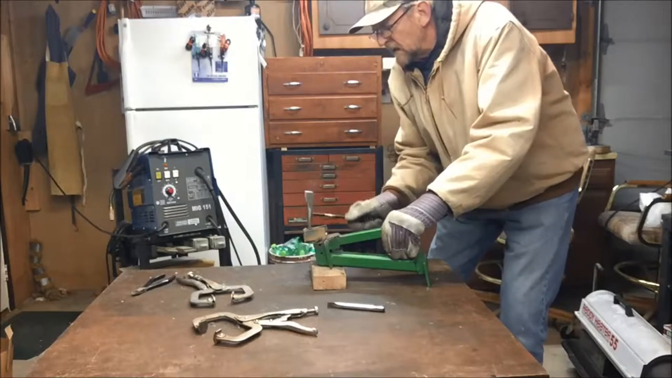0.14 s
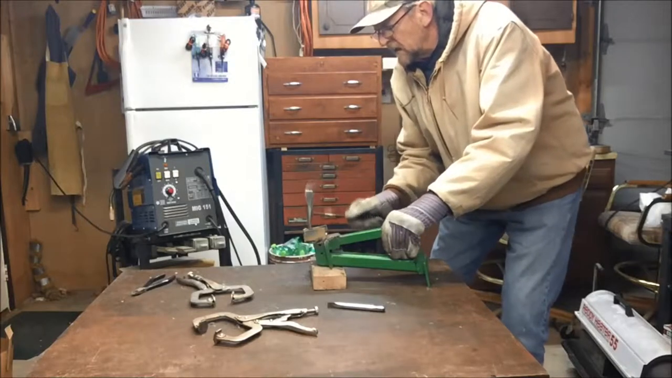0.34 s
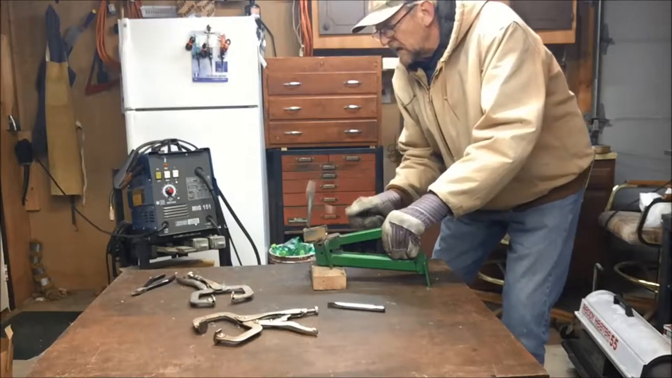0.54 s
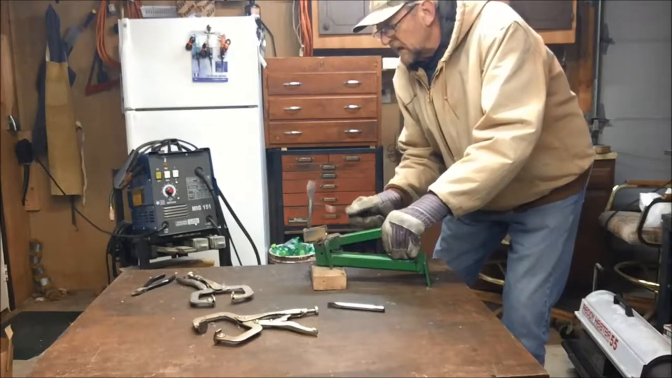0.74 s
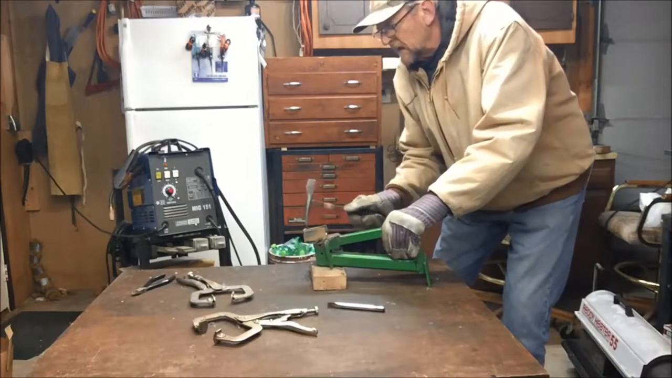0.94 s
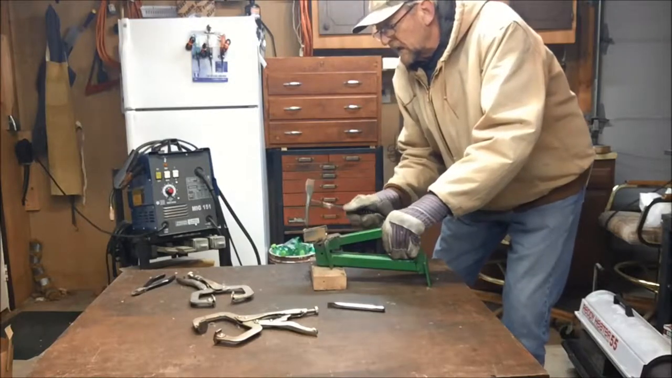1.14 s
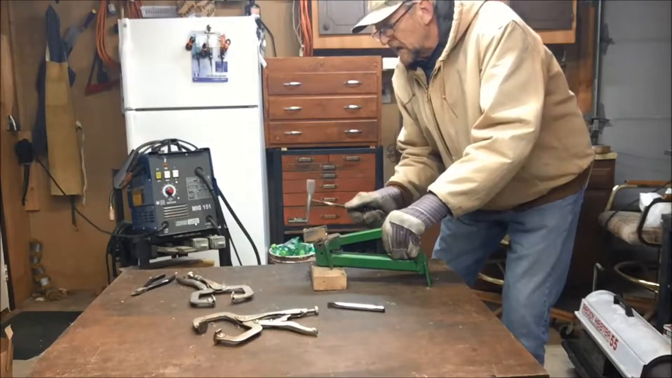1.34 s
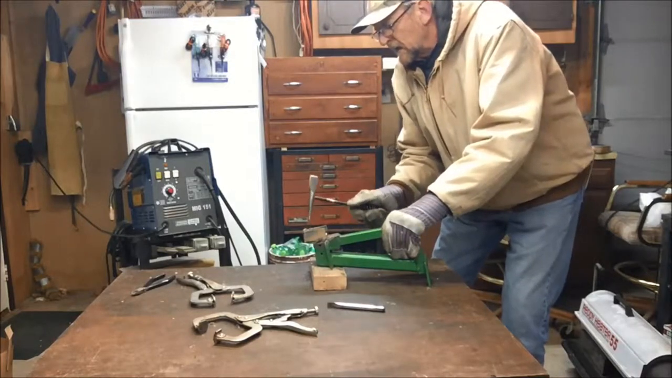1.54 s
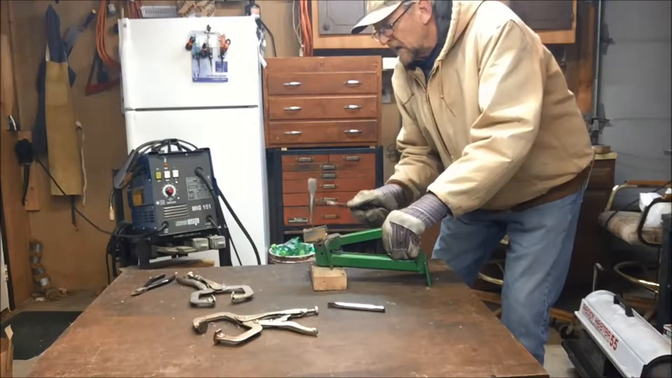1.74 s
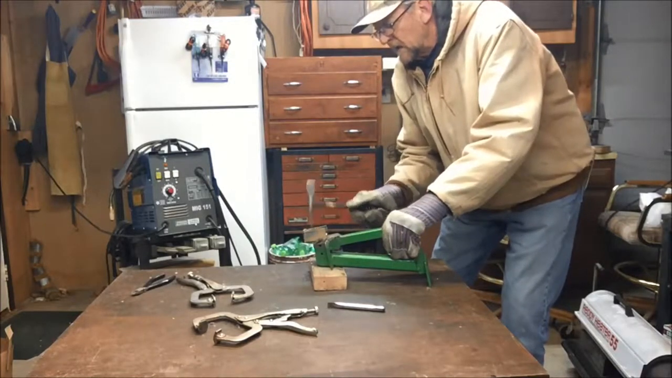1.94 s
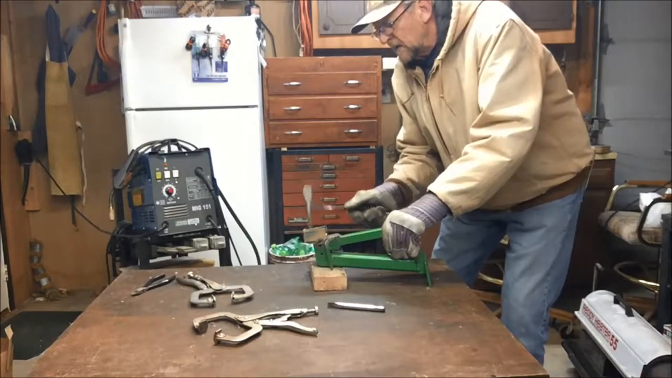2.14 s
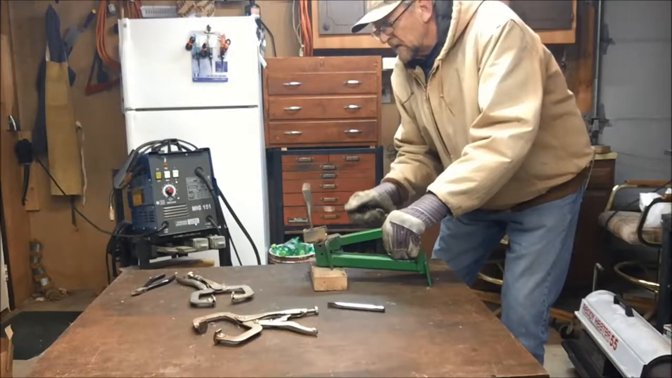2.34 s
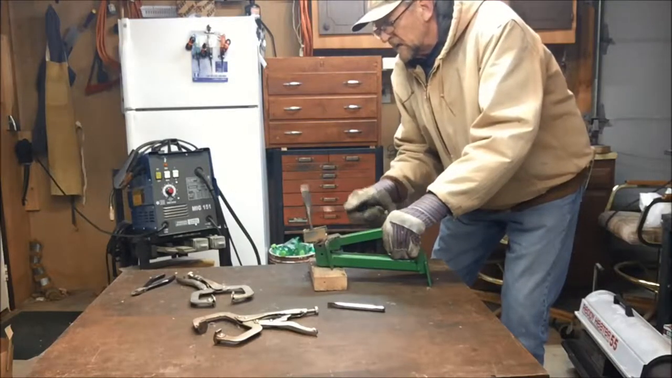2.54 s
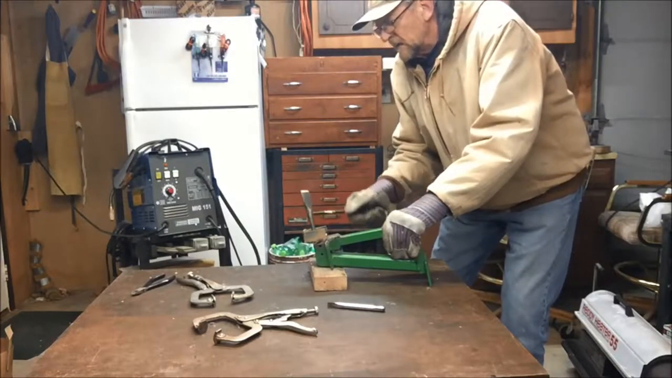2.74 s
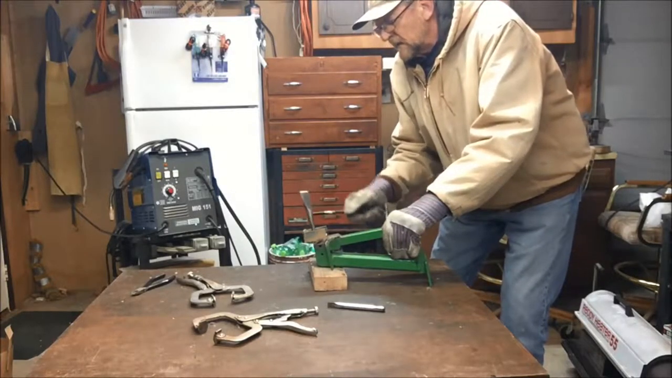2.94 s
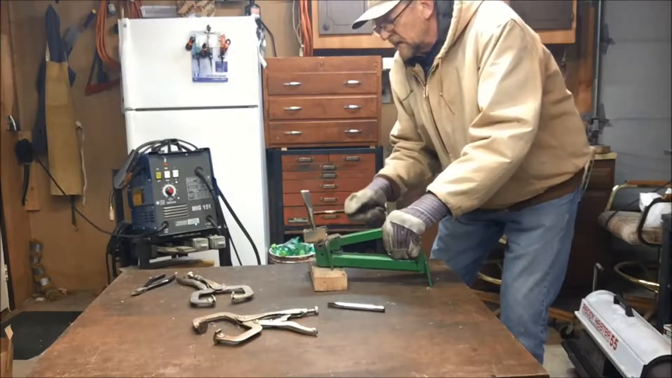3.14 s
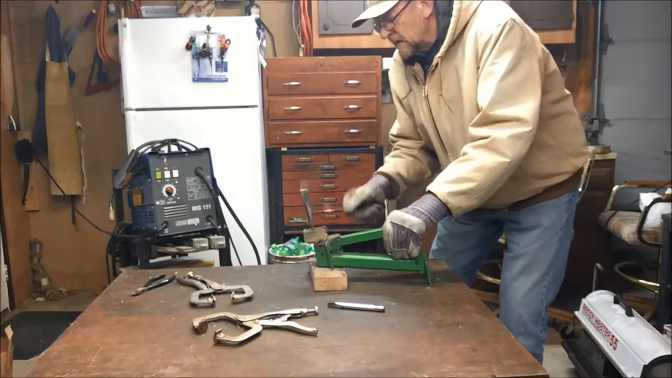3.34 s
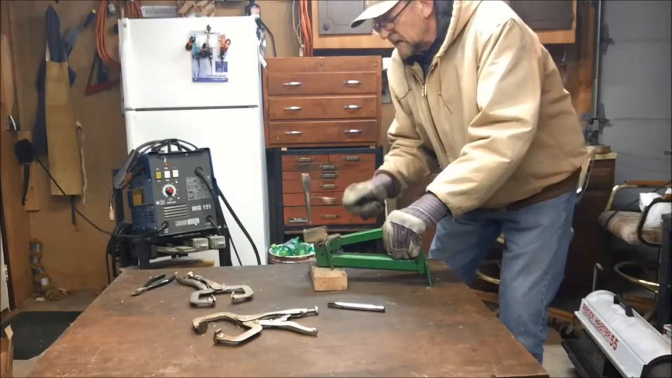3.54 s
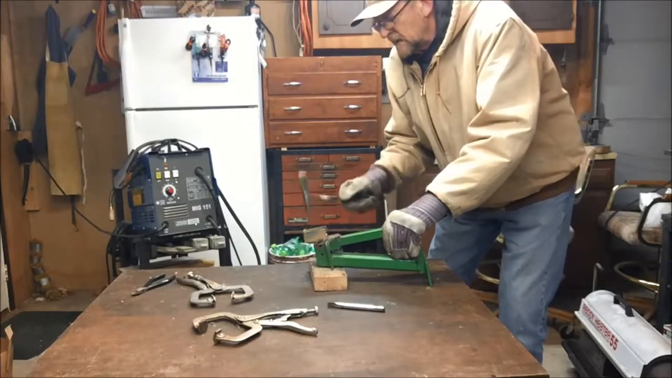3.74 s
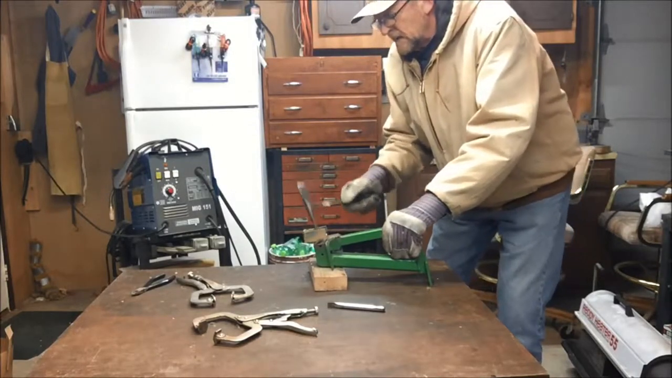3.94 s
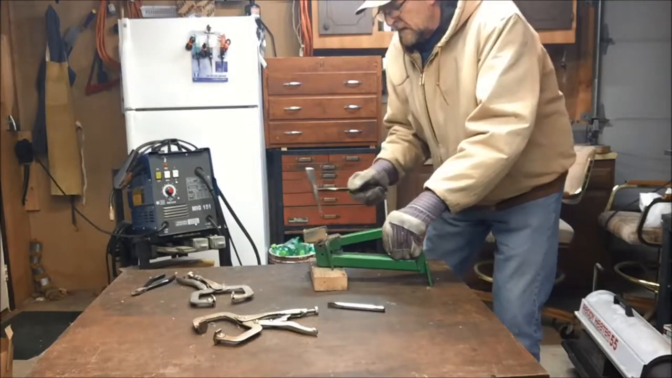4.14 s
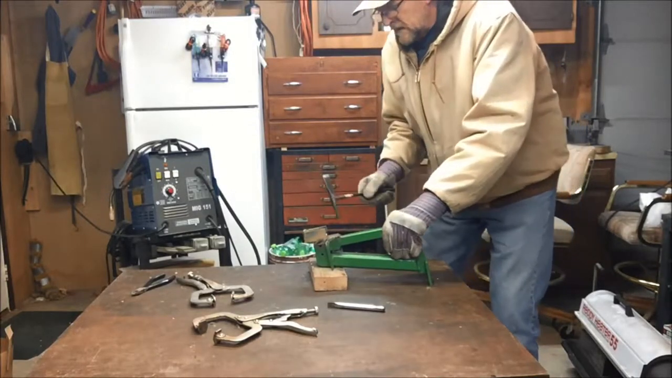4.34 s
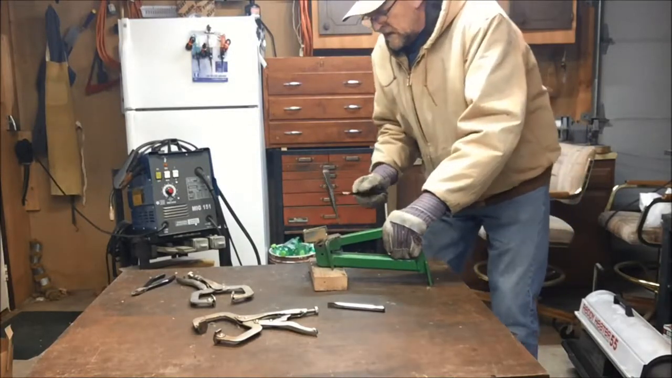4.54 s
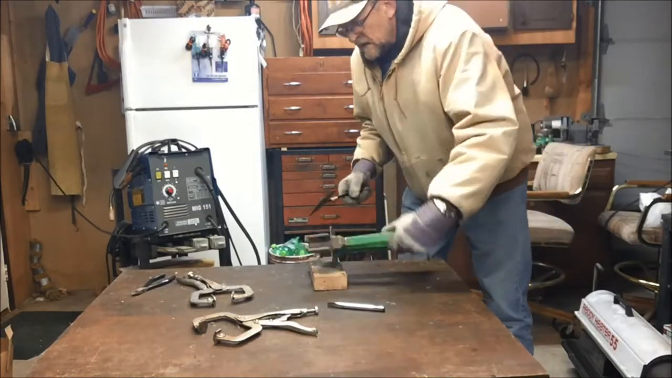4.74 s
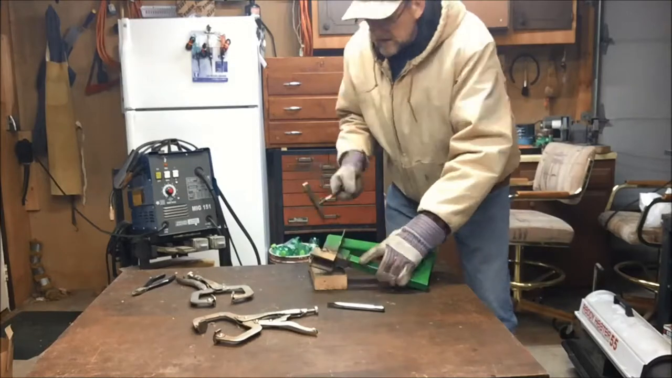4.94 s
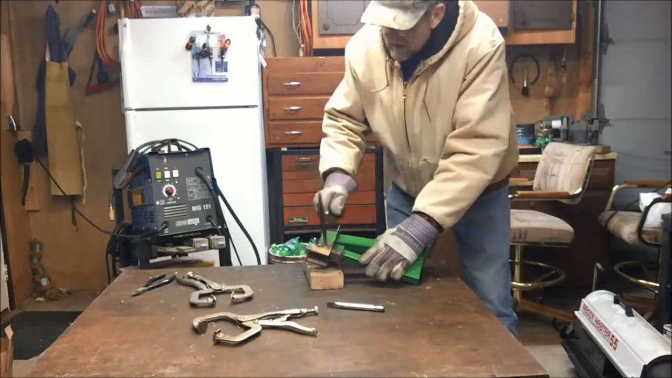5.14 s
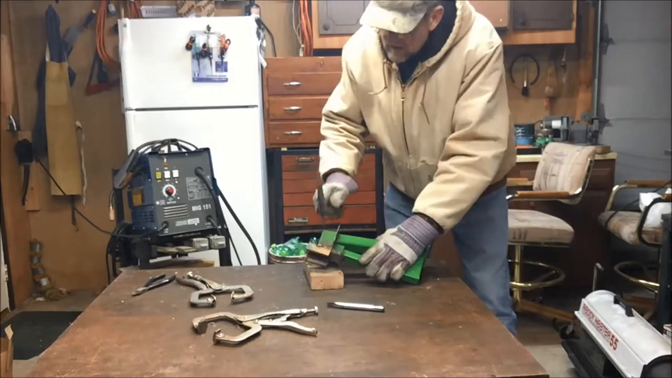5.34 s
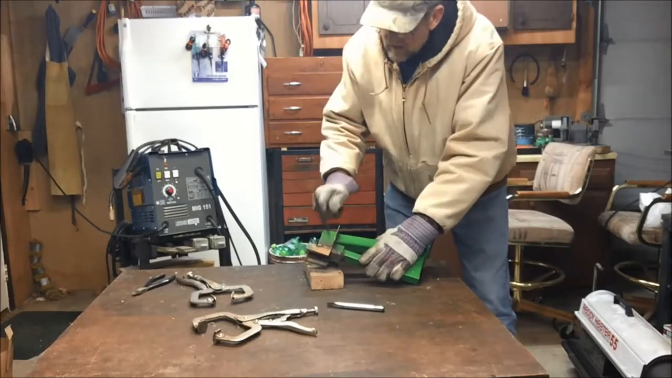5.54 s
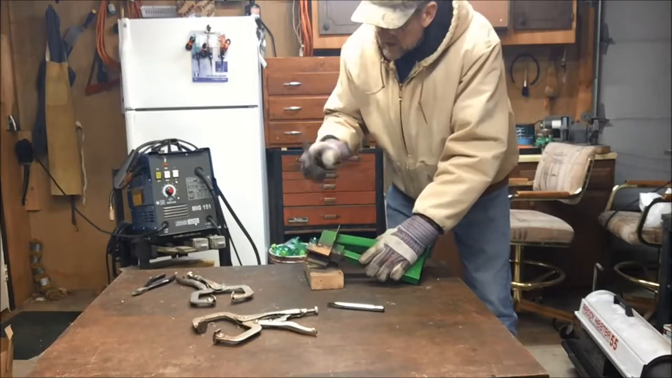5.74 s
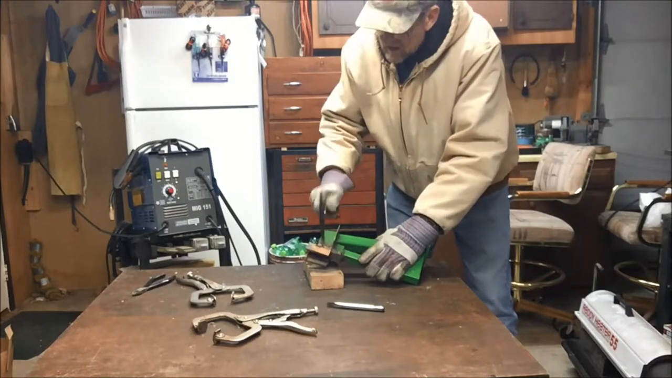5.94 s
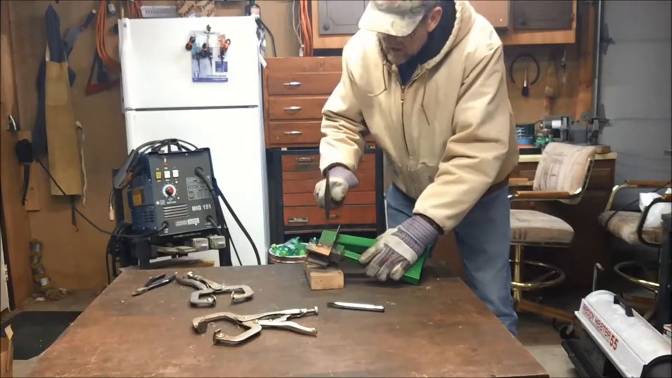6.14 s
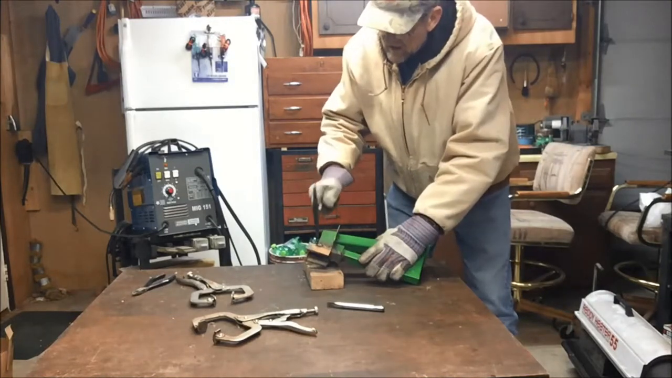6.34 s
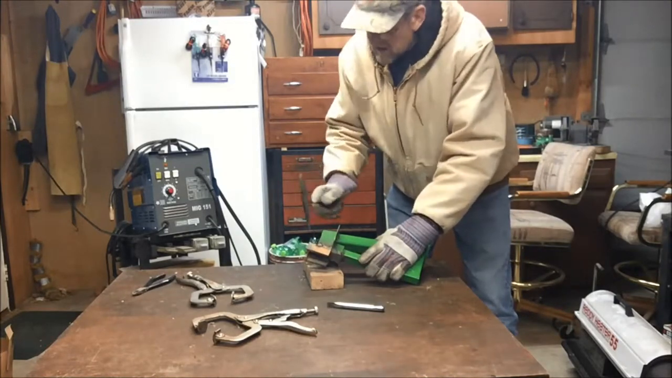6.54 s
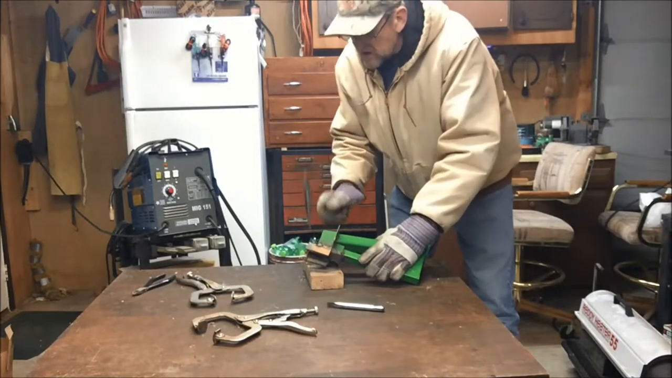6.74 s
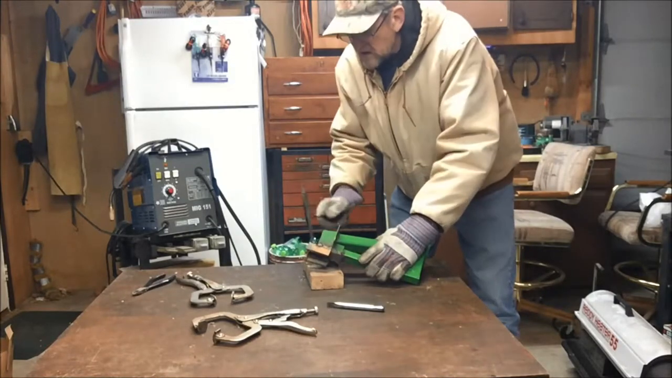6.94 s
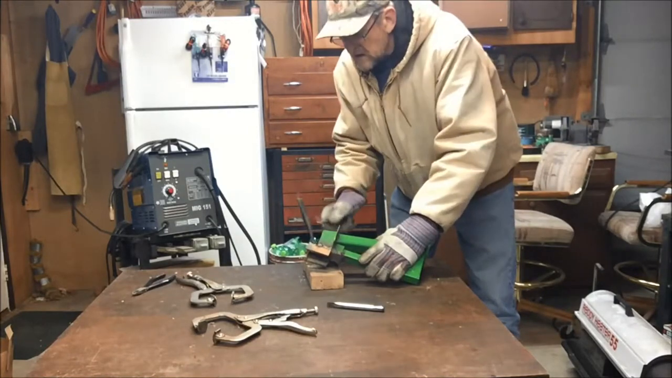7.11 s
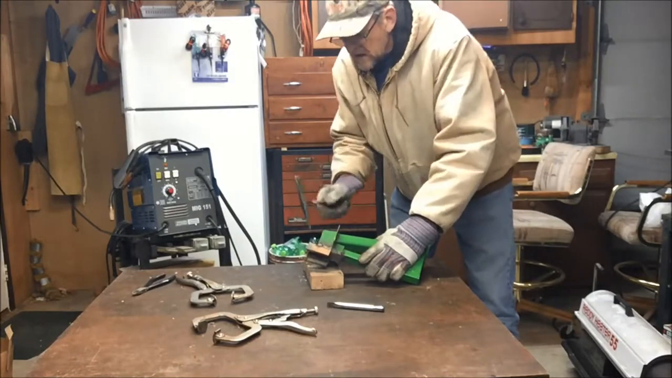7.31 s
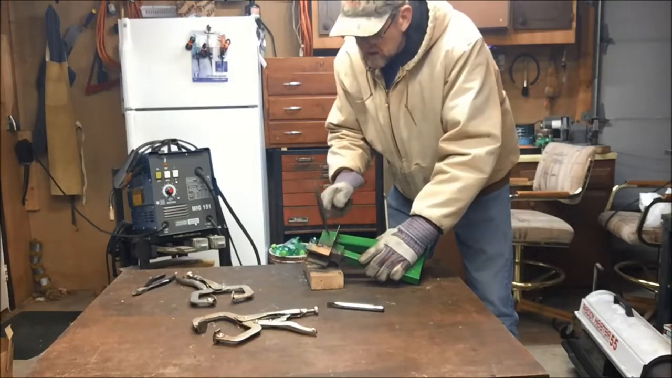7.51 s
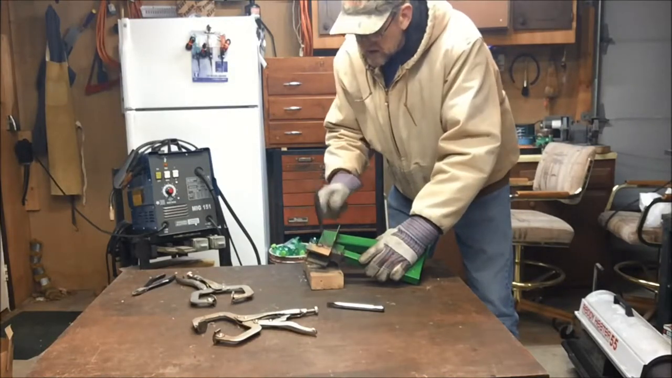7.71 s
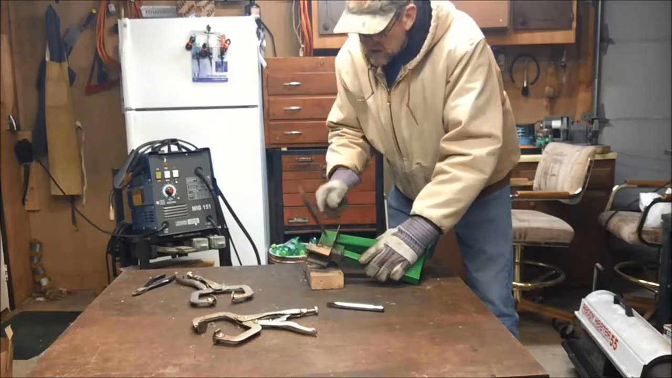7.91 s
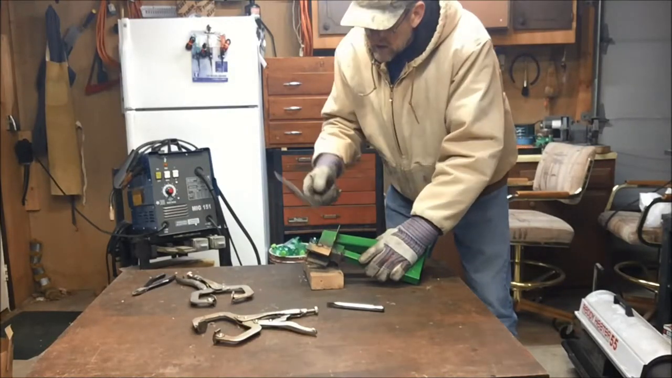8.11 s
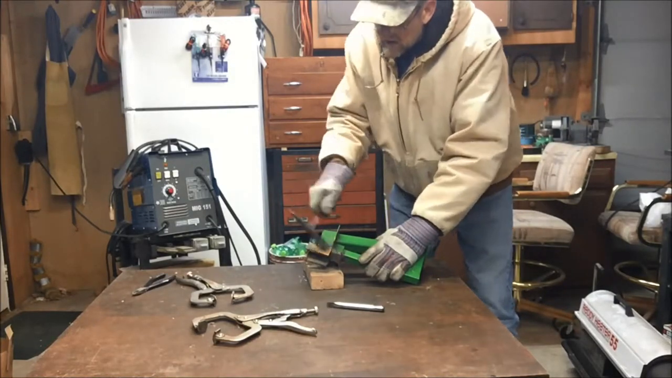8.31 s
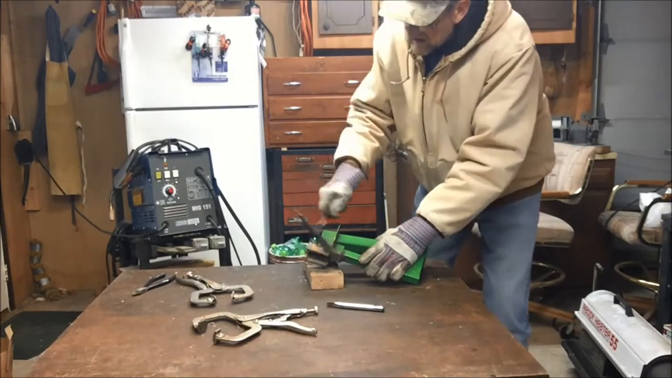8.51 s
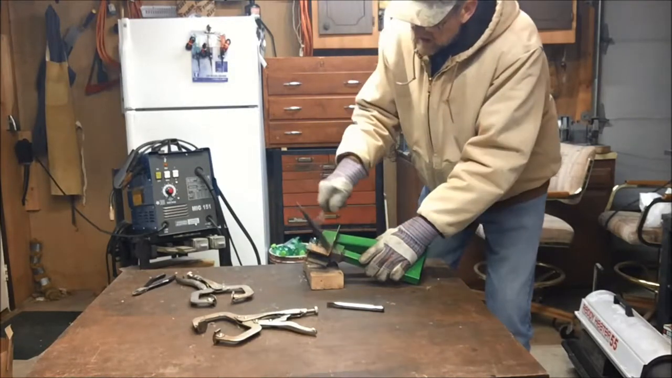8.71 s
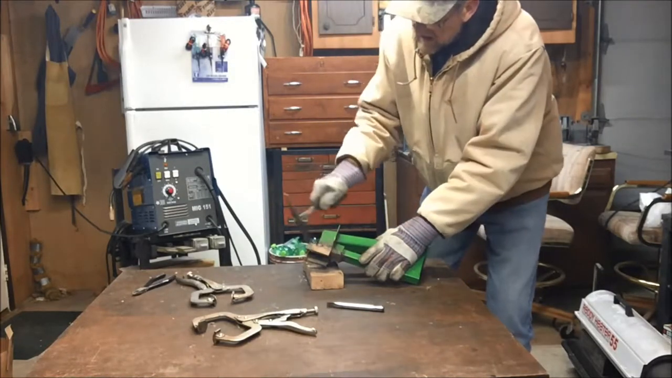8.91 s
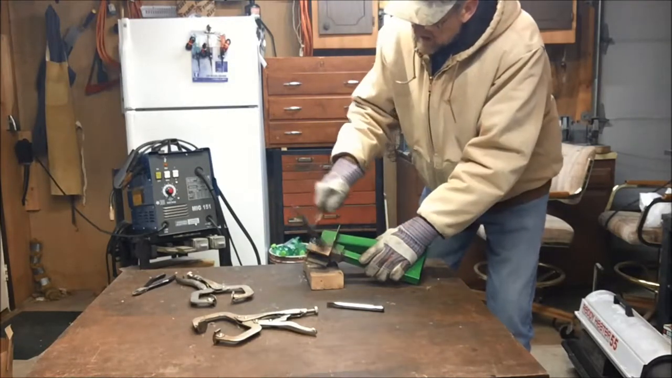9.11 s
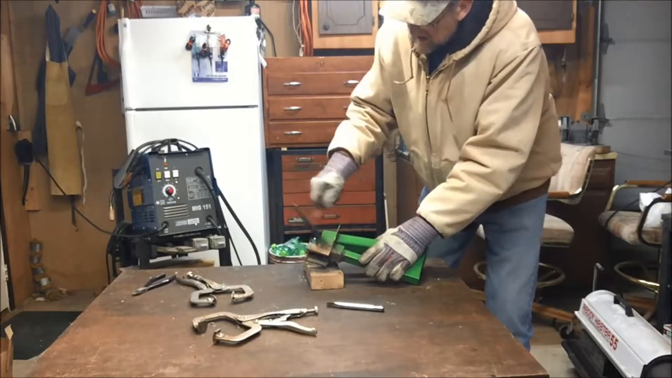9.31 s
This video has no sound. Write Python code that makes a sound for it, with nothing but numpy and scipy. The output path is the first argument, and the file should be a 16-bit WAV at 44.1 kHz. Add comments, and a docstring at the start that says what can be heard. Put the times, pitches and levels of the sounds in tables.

```python
"""Chipping slag, then double-quick

A hammer chips slag off a welded steel bracket on a workshop bench, about 4.5 blows a second, over a low rumble.
Each blow layers decaying modes (the metal's notes) over coloured noise: a crack and a dying wash.
After a short dropout the scene plays four times as fast: the bracket bumps down in bursts of clatter and boom,
then is hammered on its side, with modes two octaves up and rings a quarter as long, in scratchy runs."""
import sys
import numpy as np
from scipy.fft import rfft, irfft, next_fast_len
from scipy.io import wavfile
from scipy.ndimage import uniform_filter1d

SR = 44100
rng = np.random.default_rng(int(sys.argv[2]) if len(sys.argv) > 2 else 0)


def output_pcm(signal):
    """Save a mono or channel-first signal as 16-bit PCM at the path in sys.argv[1].

    Samples are clipped to [-1, 1] before scaling.
    """
    pcm = np.clip(np.atleast_2d(signal).T, -1, 1) * 32767
    wavfile.write(sys.argv[1], SR, np.round(pcm).astype(np.int16))


N = 413216  # length in samples

NORMAL, FAST = 1, 4  # playback speed before and after the dropout
TOP_HZ = 15900  # upper band limit
GRAZE_LEAD_S, FAINT_GRAZE_DB = .0037, -24  # how far ahead of the blow; level for blows not in GRAZES
PING_SCATTER_DB = 2  # from blow to blow

# All blow levels are before the trims of the voices and pings.
# Blows on the flat bracket. The swing sets the thud, the cleanness of the contact the clang:
# start_s, thud_db, clang_db, bracket_ping_db, hammer_ping_db
FLAT_BLOWS = [(0.002, -21, -16, -41, -43), (0.2331, -23.5, -22, -39, -34.5),
              (0.4641, -22, -22.5, -48, -29.5), (0.6833, -22.5, -17.5, -37, -61),
              (0.887, -25, -27.5, -55, -37.5), (1.101, -23, -20.0, -35.5, -41.0),
              (1.298, -24, -31, -40.5, -50), (1.5116, -27, -39, -42, -40),
              (1.7257, -24.5, -38.5, -54, -42.5), (1.947, -24.5, -29.5, -39, -44.0),
              (2.158, -23, -40.5, -45.5, -66), (2.3628, -20.5, -31, -45, -71),
              (2.5746, -20.0, -27.0, -59, -29.5), (2.7928, -20, -21.5, -38, -37),
              (3.013, -20, -22.5, -44, -49), (3.2364, -22.5, -26, -34, -35),
              (3.4621, -21.5, -23, -33.5, -32.5), (3.6947, -19, -36.5, -48, -78),
              (3.9421, -19, -31.5, -30.5, -44.0)]
# Blows on the turned bracket, in four runs: start_s, thud_db, clang_db
TURNED_BLOWS = [(5.263, -20.0, -23), (5.3158, -20.5, -31), (5.3693, -23, -29.5), (5.4227, -19, -26),
                (5.477, -17.5, -24.5), (5.53, -20, -31), (5.584, -17.5, -21), (5.6356, -18, -24),
                (5.689, -20.5, -25), (5.746, -26.5, -30.5), (6.064, -19, -28.5), (6.12, -17.5, -27),
                (6.1729, -17.5, -22.5), (6.2285, -18, -24.5), (6.2831, -20, -26.5), (6.3357, -24.5, -30),
                (6.3907, -19.5, -23.5), (6.447, -20, -37), (6.4989, -19, -21.5), (6.5552, -21.0, -21.5),
                (6.6152, -35, -38), (6.679, -24.5, -34), (6.748, -20.5, -30.5), (6.8128, -18.5, -21.0),
                (6.8723, -17.5, -27.5), (6.928, -22.5, -28.5), (6.989, -19.5, -26.5), (7.05, -19.0, -24.5),
                (7.1099, -18, -30.0), (7.1677, -28.5, -30), (7.231, -20.5, -32), (7.293, -17.5, -34),
                (7.362, -15.5, -38.5), (7.501, -27, -30.5), (7.5551, -18, -22), (7.61, -17.5, -22.0),
                (7.669, -22, -23.5), (7.726, -20, -23.5), (7.784, -19, -24.0), (7.8428, -18, -22.5),
                (7.8984, -18.5, -27), (7.9567, -24, -30), (8.0154, -28, -28), (8.357, -25, -27.5),
                (8.431, -23.5, -27), (8.495, -26.5, -25.5), (8.564, -24, -30.5), (8.628, -20.5, -25.5),
                (8.6902, -25.0, -22.5), (8.7499, -22.5, -25.5), (8.8094, -22.5, -21),
                (8.8671, -24.5, -23.5), (8.929, -25.5, -23.5), (8.99, -26.5, -28.5), (9.049, -29.5, -27.5),
                (9.113, -24.0, -25.5), (9.1716, -22.5, -22), (9.2313, -25, -27), (9.2905, -24.5, -24),
                (9.352, -23, -31)]
# The bracket bumps onto the bench, and later rocks on it between blows:
# start_s, level_db (before trim), boom_db (relative to level_db, before trim)
BENCH_BUMPS = [(4.817, -38, 11), (4.86, -17, -4.5), (4.871, -20.5, 2), (4.9, -6, -7), (4.907, -12.5, -21),
               (4.918, -18, 1), (4.933, -16.5, 4), (4.947, -8.5, -2), (5.127, -11.5, -3.5),
               (5.132, -8, -10), (5.145, -13, 0), (5.168, -23, 2.5), (6.694, -22, 3), (7.356, -13.5, -4),
               (7.38, -39, -12), (9.012, -20, -29), (9.062, -17, -21)]
# Borders of six registers, bench thud, clack, bracket clang, its edge, hammer chink and tick: border_hz
REGISTER_BORDERS = [20, 420, 1400, 2800, 4150, 6300, 16500]

# Pitches and decays of modes, pings, wash and humps are at normal speed; fast playback scales them.
# Modes of bench, bracket and hammer, bracket lying flat: pitch_hz, level_db (relative), t60_s
FLAT_MODES = [(101, -3, .3), (114, 3, .3), (129, 3, .35), (203, -3, .3), (240, -6, .25), (285, -5, .24),
              (312, -2, .25), (341, -6, .25), (385, -9, .25), (505, -16, .25), (727, -14, .3),
              (787, -13, .3), (922, -10, .3), (982, -10, .3), (1599, 1, .29), (1748, -7, .26),
              (1808, -8, .28), (2149, -3, .28), (2369, -11, .28), (2460, 0, .32), (3480, -15, .22),
              (3569, -7, .3), (3660, -13, .22), (3763, -7, .24), (4490, -15, .2), (4963, -20, .2),
              (4673, -20, .2), (5480, -20, .3), (5626, -17, .36), (6062, -15, .32), (7750, -23, .22),
              (7176, -17, .24), (8900, -18, .24), (10520, -23, .25), (13030, -22, .48)]
# The same with the bracket turned on its side: pitch_hz, level_db (relative), t60_s
TURNED_MODES = [(113, 2, .32), (129, 1, .36), (281, -7, .26), (312, -6, .26), (337, -9, .28),
                (506, -7, .22), (624, -12, .25), (958, -15, .26), (991, -14, .28), (1421, -11, .22),
                (1745, -9, .22), (1778, 0, .25), (1815, -10, .22), (2470, -12, .25), (2500, -12, .25),
                (2569, -4, .3), (2669, -20, .25), (2918, -18, .25), (3110, -11, .22), (3180, -17, .22),
                (3413, -14, .22), (3564, -11, .22), (3625, -12, .22), (3745, -12, .22)]
# Crowded weak modes and the room's answer, merged into a wash: pitch_hz, level_db (per Hz, relative)
WASH_COLOUR = [(25, -46), (55, -10.5), (120, -3.5), (165, -8), (300, -4), (430, -13), (950, -19),
               (1300, -23.5), (2100, -22.5), (2800, -24), (3600, -22.5), (5000, -32), (13500, -38.5),
               (15600, -42)]
# Short-lived resonances that rise out of the wash: pitch_hz, width_hz, lift_db
WASH_HUMPS = [(1596, 54, 15), (1785, 260, 9.5), (2182, 130, 11.5), (2540, 40, 6), (3405, 48, 6),
              (3770, 48, 5.5), (4400, 330, 1), (5230, 69, 13), (6470, 1100, 7.5), (8900, 310, 10.5),
              (12150, 1100, 6.5)]
# Colour of the bench bumps: pitch_hz, level_db (per Hz, relative)
BENCH_COLOUR = [(59, -60), (100, -37), (295, -12), (471, 0.5), (676, -11), (784, -10), (872, -18),
                (1250, -12.5), (1800, -22.5), (2930, -20.5), (3470, -26.5), (7290, -31), (16000, -49)]
# Colour of the workshop rumble at normal speed: pitch_hz, level_db (per Hz, relative)
ROOM_COLOUR = [(15, -69), (25, -41), (48, -15), (120, -6), (242, -11), (277, -17.5), (317, -8.5),
               (405, -23.5), (575, -21), (911, -29.5), (3080, -36.5), (3520, -40.5), (4140, -38),
               (5570, -45), (16000, -56)]
# Colour of the rumble at fast speed, as heard: pitch_hz, level_db (per Hz, relative)
FAST_ROOM_COLOUR = [(35, -96), (60, -71), (233, -10), (371, -13.5), (480, -4), (566, -12), (651, -10),
                    (1040, -15.5), (1170, -17.5), (1340, -14), (1740, -26.5), (2350, -23.5), (3500, -32.5),
                    (7940, -36), (16000, -42.5)]
# The level dip where the speed changes: start_s, end_s
SPEED_DROPOUT = (4.652, 4.682)

# Pings are modes or groups that sing out or stay mute, by where the blow lands.
# Flat: three that follow the spot, the bracket's note, the hammer's lower and upper ring.
# Each group lists: pitch_hz, level_db (relative), t60_s
FLAT_PING_MODES = [
    [(2580, 0, .3), (2659, -13, .22)],
    [(3397, 0, .28), (4345, -7, .22), (4430, -7, .22), (5204, -8, .28), (6550, -12, .25)],
    [(2958, 0, .26), (3030, -6, .2), (3103, -1, .22), (6425, -2, .3)],
    [(4260, 0, .44), (9380, -9, .36)],
    [(6720, -7, .12), (6795, -2, .15), (6865, 0, .22), (6935, -2, .16), (7020, -6, .12)],
    [(12040, -1, .16), (12120, 0, .18), (12210, -2, .15)],
]
# Three groups for the turned bracket: pitch_hz, level_db (relative), t60_s
TURNED_PING_MODES = [
    [(1598, 0, .26)],
    [(2122, 0, .23)],
    [(2174, 0, .28)],
]
# Where the blows land along the weld, lying flat: start_s, spot (0-1)
FLAT_PATH = [(0, 0.15), (.68, 0.24), (1.2, 0.25), (2, 0.52), (2.6, 0.59), (3.3, 0.9), (3.9, 0.97)]
# Where they land on the turned bracket: start_s, spot (0-1)
TURNED_PATH = [(5.26, 0.23), (5.35, 0.49), (5.65, 0.094), (6.07, 0.43), (6.2, 0), (6.39, 0.23),
               (6.55, 0.56), (7.15, 0.77), (7.3, 0.32), (7.55, 0.18), (7.78, 0.12), (7.9, 0.18), (8.4, 1),
               (9.35, 1)]
# Glancing blows that graze the weld just before landing: start_s (of the blow), level_db (relative to it)
GLANCING_BLOWS = [(.2324, -3.5), (.887, -7), (1.298, -18), (2.158, -5.5), (3.2362, -7), (3.4627, -11)]
# How each register answers a blow on the flat bracket, from thud to tick:
# trim_db, clang_share (0-1, rest follows the thud), along_db (gained along the weld),
# ring_db (modes over wash), wash_t60_s, crack_db, rise_s (time constant)
FLAT_REGISTER_VOICES = [(1, 0, -0.5, -7, 0.26, 25.5, 0.0051), (-5, 0.22, 0.9, -5, 0.25, -40, 0.00045),
                        (0.5, 0.79, -2.5, -2, 0.31, 2, 0.000079), (-8.5, 0.85, 1, 0.5, 0.37, -14, .0002),
                        (-12.5, 0.67, 0.5, -5.5, 0.31, 6, 0.00024), (-14.5, 0.76, 7, -8, 0.32, 7.5, .0002)]
# The turned bracket, lower four registers only. Same columns, times at normal speed:
# trim_db, clang_share (0-1), along_db, ring_db, wash_t60_s, crack_db, rise_s
TURNED_REGISTER_VOICES = [(-0.5, 0.086, 0, 4, 0.26, -3.5, 0.0065), (-5, 0.4, -.8, -1.5, 0.31, -30, 0.0029),
                          (-.5, 1, -4, 3, 0.35, -5, 0.0018), (-6, 0.96, -8.5, 5.5, 0.56, 3, 0.00037)]
# A ping is loudest at one spot and fades with the square of the distance, in the order of the pings.
# Levels are over the clang, before the ping trim: over_db, best_spot (0-1), lost_db (a whole weld away)
FLAT_PING_LAWS = [(-10, .1, 15), (-10.5, 0, 40), (-16, 0.42, 14.5)]
# The turned bracket's pings: over_db, best_spot (0-1), lost_db
TURNED_PING_LAWS = [(1.5, 0.7, 62), (-4, 0.29, 16), (0.5, 0.72, 143)]
# The hammer's upper ring, over the mean of clang and hammer ping: over_db, best_spot (0-1), lost_db
UPPER_RING_LAW = (-2.5, 1, 21)


def amp(db):
    """Decibels to gain."""
    return 10 ** (np.asarray(db) / 20)


def rms(x):
    """Root mean square."""
    return np.sqrt(np.mean(x ** 2) + 1e-20)


def along(points, hz):
    """Read a table of pitch and level on a logarithmic pitch axis."""
    pitch_hz, level_db = np.transpose(points)
    return np.interp(np.log(hz + 1), np.log(pitch_hz + 1), level_db)


def noise(gain, size):
    """Noise of rms 1, coloured by a gain that depends on frequency."""
    m = next_fast_len(size)
    spectrum = rfft(rng.standard_normal(m)) * gain(np.fft.rfftfreq(m, 1 / SR))
    x = irfft(spectrum, m)[:size]
    return x / rms(x)


def add(track, start_s, sound):
    """Mix a sound into the track, trimming whatever falls outside."""
    start = round(start_s * SR)
    sound = sound[max(-start, 0):N - start]
    track[max(start, 0):][:len(sound)] += sound


def workshop():
    """Steady rumble of coloured noise, with another colour once the scene runs fast."""
    slow = amp(-38.0) * noise(lambda hz: amp(along(ROOM_COLOUR, hz)), size=N)
    fast = amp(-37.0) * noise(lambda hz: amp(along(FAST_ROOM_COLOUR, hz)), size=N)
    return np.where(np.arange(N) / SR < SPEED_DROPOUT[1], slow, fast)


def graze(blow_sound, graze_db):
    """A light scrape of treble noise, scaled to the first 50 ms of the blow it precedes."""
    scrape = noise(lambda hz: wash_gain(hz) * (hz > 900), size=int(GRAZE_LEAD_S * SR))
    return amp(graze_db) * rms(blow_sound[:SR // 20]) * scrape


def spot_at(path, s):
    """Place on the weld that is struck at time s."""
    return np.interp(s, *np.transpose(path))


def ping_level(law, db, spot):
    """A ping is loudest at its best spot, with random scatter from blow to blow."""
    over_db, best_spot, lost_db = law
    scatter_db = PING_SCATTER_DB * rng.standard_normal()
    return db + over_db - lost_db * (spot - best_spot) ** 2 + scatter_db


def ring(modes, t, scatter_db, blur):
    """Decaying modes at new strengths: loud at first, then wavering in level and phase among the reflections."""
    out = np.zeros(len(t))
    knots = np.arange(0, t[-1] + .03, .018)
    for pitch_hz, level_db, t60_s in modes:
        chance = (pitch_hz / 3000) ** .35  # short waves depend more on the spot struck
        wobble = rng.standard_normal(len(knots)) + 1j * rng.standard_normal(len(knots))
        waver = np.interp(t, knots, 1 + chance * blur * wobble)
        swing = (waver * np.exp(2j * np.pi * (pitch_hz * t + rng.random()))).real
        strength_db = level_db + chance * scatter_db * rng.standard_normal()
        out += amp(strength_db - 60 * t / t60_s) * swing
    return out * (1 + amp(-1 - 60 * t / 0.12))


def wash_gain(hz):
    """Colour of the wash with its resonant humps."""
    humps_db = sum(lift_db / (1 + (2 * (hz - centre_hz) / width_hz) ** 2)
                   for centre_hz, width_hz, lift_db in WASH_HUMPS)
    return amp(along(WASH_COLOUR, hz) + humps_db)


def lumps(t, depth_db):
    """Crumbling slag and small rebounds make the noise of a blow ragged."""
    knots = np.arange(0, t[-1] + .03, .008)
    return amp(depth_db * np.interp(t, knots, rng.standard_normal(len(knots))))


def blow(thud_db, clang_db, spot, ping_dbs, modes, pings, voices, ping_trim_db, ragged_db, speed):
    """One blow: singing pings, and in each register a crack, a dying wash and ringing modes."""
    t = np.arange(SR * 2 // 5 // speed) * speed / SR  # the workshop's own time
    early = t < .06  # stretch on which levels are set
    out, ragged = np.zeros(len(t)), lumps(t, ragged_db)
    for ping, level_db in zip(pings, ping_dbs):
        tone = ring(ping, t, scatter_db=2, blur=.4) * (1 - np.exp(-t / .0003))
        out += amp(level_db + ping_trim_db) * tone / rms(tone[early])
    for lo, hi, voice in zip(REGISTER_BORDERS, REGISTER_BORDERS[1:], voices):
        trim_db, clang_share, along_db, ring_db, wash_t60_s, crack_db, rise_s = voice
        level_db = thud_db + clang_share * (clang_db - thud_db) + along_db * spot
        wash = noise(lambda hz: wash_gain(hz / speed) * (hz >= lo * speed) * (hz < hi * speed), size=len(t))
        crack = amp(crack_db - 60 * t / 0.012)
        wash *= ragged * amp(-60 * t / wash_t60_s) + crack
        metal = ring([m for m in modes if lo <= m[0] < hi], t, scatter_db=4, blur=.4)
        layer = wash / rms(wash[early]) + amp(ring_db) * metal / rms(metal[early])
        layer *= (1 - np.exp(-t / rise_s)) ** 2  # heavy things take longer to get moving
        out += amp(level_db + trim_db) * layer / rms(layer[early])
    return out


def hammer():
    """Even blows that work along the weld, each with a graze a few milliseconds ahead, mostly faint."""
    out = np.zeros(N)
    for start_s, thud_db, clang_db, bracket_db, hammer_db in FLAT_BLOWS:
        spot = spot_at(FLAT_PATH, start_s)
        ping_dbs = [ping_level(law, clang_db, spot) for law in FLAT_PING_LAWS]
        upper_db = ping_level(UPPER_RING_LAW, (clang_db + hammer_db) / 2, spot)
        ping_dbs += [bracket_db, hammer_db, upper_db]
        sound = blow(thud_db, clang_db, spot, ping_dbs, FLAT_MODES, FLAT_PING_MODES,
                     FLAT_REGISTER_VOICES, ping_trim_db=2.0, ragged_db=2.0, speed=NORMAL)
        add(out, start_s, sound)
        near = (db for when, db in GLANCING_BLOWS if abs(when - start_s) < .05)
        add(out, start_s - GRAZE_LEAD_S, graze(sound, next(near, FAINT_GRAZE_DB)))
    return out


def bumps():
    """The hand damps the steel: each contact is a dull clatter and a boom of the bench."""
    out, t = np.zeros(N), np.arange(SR // 5) / SR
    for start_s, level_db, boom_db in BENCH_BUMPS:
        clatter = noise(lambda hz: amp(along(BENCH_COLOUR, hz)) * (hz > 700), size=len(t))
        boom = noise(lambda hz: amp(along(BENCH_COLOUR, hz)) * (hz <= 700), size=len(t))
        clatter *= amp(level_db - 9.5 - 60 * t / 0.096) * (1 - np.exp(-t / 0.00037))
        boom *= amp(level_db + boom_db - 2.5 - 60 * t / 0.085) * (1 - np.exp(-t / 0.0014))
        add(out, start_s, clatter + boom)
    return out


def fast_hammer():
    """Runs of blows to and fro along the turned bracket; fast playback raises pitch and shortens rings."""
    out = np.zeros(N)
    for start_s, thud_db, clang_db in TURNED_BLOWS:
        spot = spot_at(TURNED_PATH, start_s)
        ping_dbs = [ping_level(law, clang_db, spot) for law in TURNED_PING_LAWS]
        sound = blow(thud_db, clang_db, spot, ping_dbs, TURNED_MODES, TURNED_PING_MODES,
                     TURNED_REGISTER_VOICES, ping_trim_db=-1.25, ragged_db=-0.5, speed=FAST)
        add(out, start_s, sound)
    return out


def scene():
    """All sources, in mono."""
    return (workshop() + hammer() + bumps() + fast_hammer())[None]


def record(dry):
    """A brief dropout at the change of speed, soft clipping and a steep band limit."""
    t = np.arange(N) / SR
    dropped = (t > SPEED_DROPOUT[0]) & (t < SPEED_DROPOUT[1])
    x = dry * uniform_filter1d(np.where(dropped, amp(-34), 1), size=64)
    x = x / (1 + (x / .95) ** 6) ** (1 / 6)  # soft clip towards .95
    m = next_fast_len(N + SR // 2)
    band_gain = 1 / np.sqrt(1 + (np.fft.rfftfreq(m, 1 / SR) / TOP_HZ) ** 160)
    return irfft(rfft(x, m) * band_gain, m)[:, :N]


dry = scene()
out = record(dry)
output_pcm(out)
```